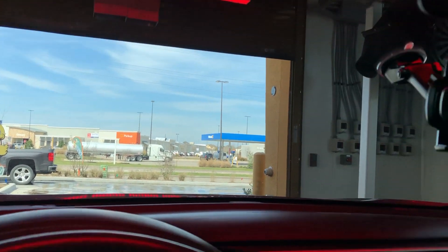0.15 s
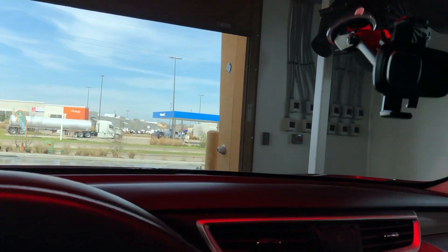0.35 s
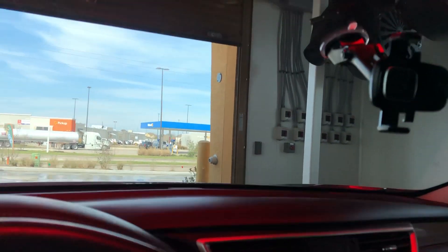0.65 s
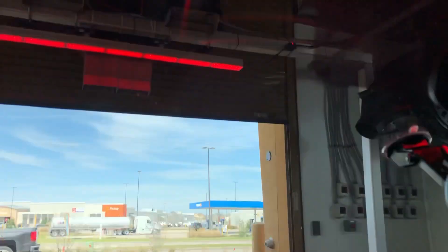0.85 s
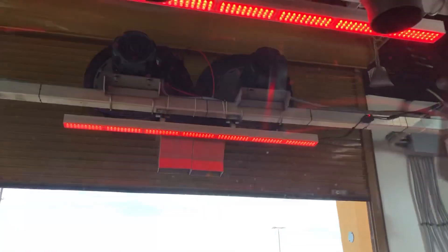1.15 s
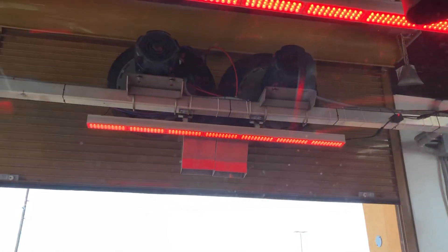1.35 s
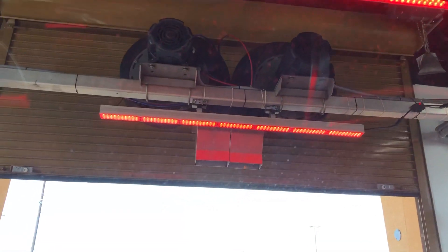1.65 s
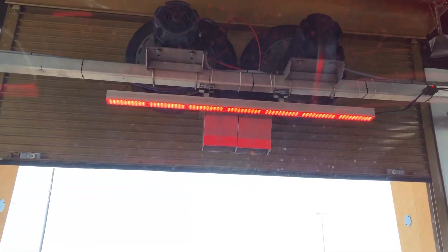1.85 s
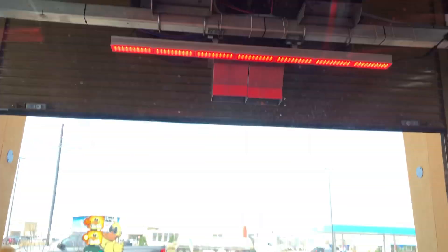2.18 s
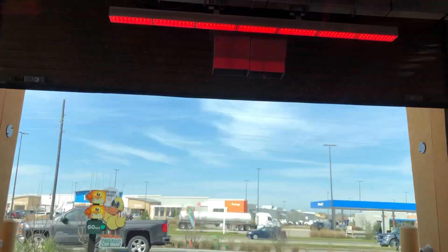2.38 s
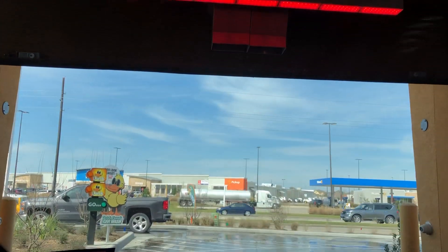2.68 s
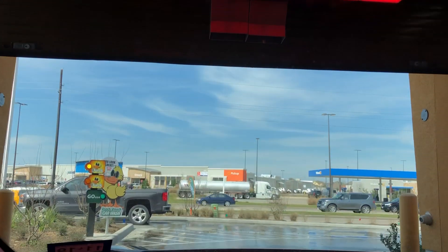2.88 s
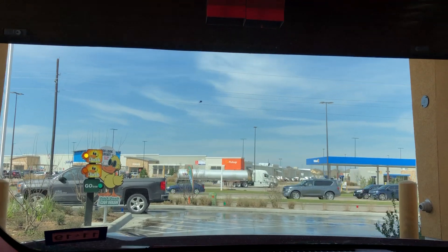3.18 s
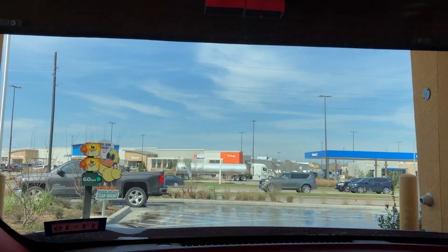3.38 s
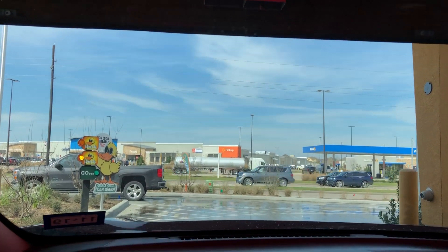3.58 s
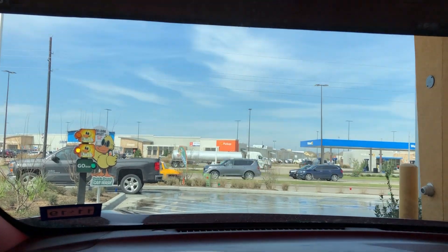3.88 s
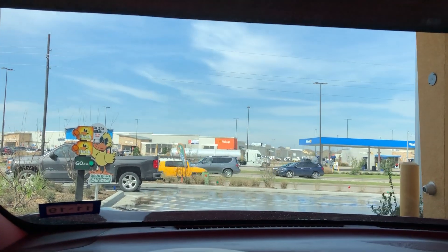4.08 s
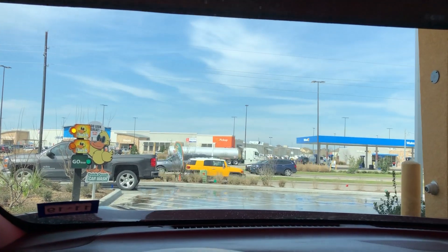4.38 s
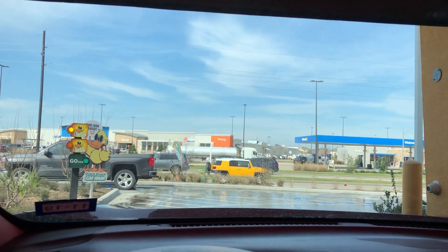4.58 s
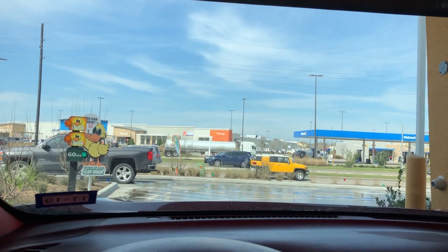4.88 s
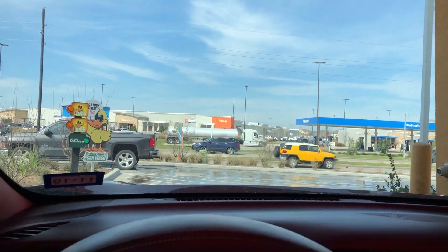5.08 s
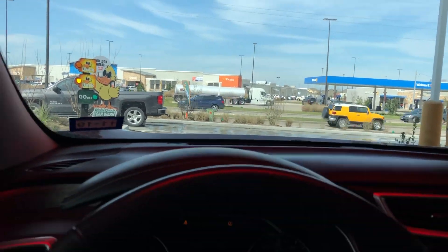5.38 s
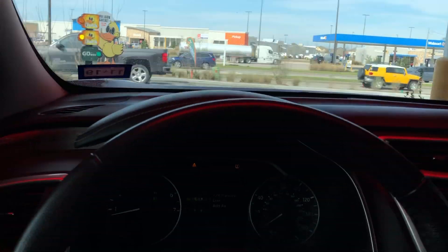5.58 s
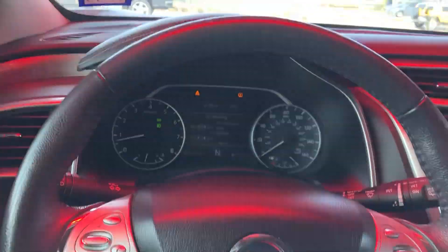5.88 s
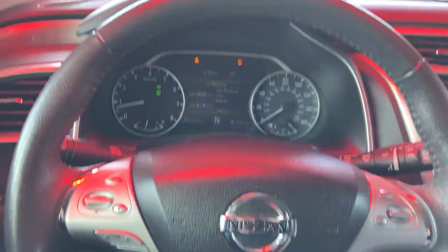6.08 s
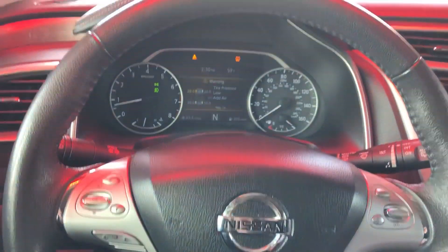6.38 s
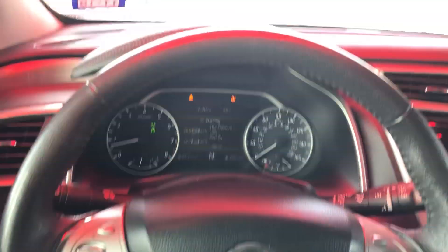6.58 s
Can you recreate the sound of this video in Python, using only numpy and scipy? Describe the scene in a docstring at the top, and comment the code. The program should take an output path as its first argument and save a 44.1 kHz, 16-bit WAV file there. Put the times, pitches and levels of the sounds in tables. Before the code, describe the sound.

Heavy low roar of car-wash air dryers heard inside a closed car, with wavering cabin boom and faint fan whine throughout.

```python
"""Car wash blowers dry a car that creeps under them, heard from the driver's seat.
Shaped noise makes the air jets on panels, glass and seals; resonances and swelling sines make the cabin boom.
The fans whine in beating sines at their blade rate. A hand rustles on the phone in puffs of bright noise;
near the end a click rings out as a snap and a faint squeak of resonant noise follows.
Gain control evens the level, a limiter ducks the peaks and a low-pass cuts the top."""
import sys
import numpy as np
from scipy import signal
from scipy.fft import rfft, irfft, next_fast_len
from scipy.io import wavfile
from scipy.ndimage import uniform_filter1d, minimum_filter1d

SR = 44100
rng = np.random.default_rng(int(sys.argv[2]) if len(sys.argv) > 2 else 0)


def generate_wav(signal):
    """Clip the signal to [-1, 1] and save it as 16-bit WAV at the path in sys.argv[1]."""
    frames = np.transpose(np.atleast_2d(signal))
    scaled = np.clip(frames, -1, 1) * 32767
    pcm = np.round(scaled).astype(np.int16)
    wavfile.write(sys.argv[1], SR, pcm)


N = 297539  # samples


def from_db(db):
    """Gain of a level in dB."""
    return 10 ** (np.asarray(db) / 20)


def rms_one(x):
    """Scaled to rms 1."""
    return x / np.sqrt(np.mean(x ** 2) + 1e-20)


def in_time(rows):
    """Each column of a curve table after the time column, drawn out to one value a sample."""
    s, *columns = np.transpose(rows)
    return [np.interp(np.arange(N) / SR, s, column) for column in columns]


def drift(rate_hz):
    """Slow chance of spread 1: noise at every 40th sample through a double one-pole low-pass."""
    r = np.exp(-2 * np.pi * rate_hz * 40 / SR)
    noise = rng.standard_normal(N // 40 + 2002)
    slow = signal.lfilter([1], [1, -2 * r, r * r], noise)[2000:]  # the filter has settled
    return np.interp(np.arange(N) / 40, np.arange(len(slow)), rms_one(slow))


def coloured(spectrum):
    """Noise of rms 1 with the given spectrum, silent outside it."""
    size = next_fast_len(N)
    hz = np.arange(1, size // 2 + 2) * SR / size
    corner_hz, corner_db = np.array(spectrum).T
    shape_db = np.interp(np.log(hz), np.log(corner_hz), corner_db, left=-200, right=-200)
    noise = irfft(rfft(rng.standard_normal(size)) * from_db(shape_db), size)
    return rms_one(noise[:N])


def turning(first, later, start_s, end_s):
    """One colour of noise gives way to another at even power."""
    turn = np.interp(np.arange(N) / SR, [start_s, end_s], [0, np.pi / 2])
    return np.cos(turn) * coloured(first) + np.sin(turn) * coloured(later)


def resonance(x, hz, width_hz):
    """Two-pole resonance, gain 1 on top."""
    r = np.exp(-np.pi * width_hz / SR)
    poles = [1, -2 * r * np.cos(2 * np.pi * hz / SR), r * r]
    return signal.lfilter([(1 - r * r) / 2, 0, (r * r - 1) / 2], poles, x)


def ring(clicks, hz, t60):
    """A unit click sets a decaying sine ringing, which falls 60 dB in t60 seconds."""
    r = from_db(-60 / (t60 * SR))
    w = 2 * np.pi * hz / SR
    return signal.lfilter([0, np.sin(w)], [1, -2 * r * np.cos(w), r * r], clicks + 1e-18)


def swell(s, db, length):
    """A smooth rise and fall centred on s."""
    place = np.clip((np.arange(N) / SR - s) / length, -.5, .5)
    return from_db(db) * np.cos(np.pi * place) ** 1.4


def air_jets():
    """Turbulent air on floor, panels, glass and seals; eddies make rush and hiss flicker together."""
    # Each row: time in seconds, strength in dB, rumble level in dB, hiss level in dB.
    air = [(0, -1, -20.5, -49.5), (0.8, -1.5, -17.5, -49.5), (1.3, 0.5, -19.5, -47), (1.75, -0.5, -15, -47),
           (2.1, 2.5, -17, -45), (2.45, 0, -16.5, -45.8), (2.9, 1.5, -18, -46.5), (3.6, 0.1, -16, -47),
           (4.25, 0.1, -20, -47.5), (4.7, 0.5, -19, -46.5), (5.4, -0.6, -18.5, -48),
           (6.05, -1.3, -17.5, -47), (6.74, -0.2, -16.5, -46.5)]
    # Spectra of the floor rumble; panels with jets ahead, then overhead; the glass with the phone held
    # up to it, then lowered to the dashboard; seals under the jets, then with the jets moving back.
    # Each row: frequency in Hz, relative density in dB per Hz.
    rumble = [(24, -34.5), (31, -26), (38, -8.5), (45, 0), (55, -0.5), (70, -1.5), (100, 4), (140, 1),
              (200, -13), (300, -30)]
    roar_ahead = [(100, -32), (170, -1), (215, -11.5), (243, -12.5), (285, -7), (311, -11.5), (344, -8),
                  (418, -12.5), (457, -12), (583, -22.5), (700, -34), (910, -55), (1540, -120)]
    roar_overhead = [(100, -22.5), (170, -0.5), (188, -8.5), (226, -7.5), (253, -10.5), (324, -5.5),
                     (356, -8.5), (413, -9.5), (454, -8), (656, -23.5), (700, -25.5), (910, -45.5),
                     (1540, -120)]
    rush_held_up = [(350, -32.5), (600, -1.5), (662, -4.5), (720, -5.5), (805, -8), (953, -9.5),
                    (1040, -13.5), (1150, -12), (1340, -15), (1370, -14), (1450, -15.5), (1490, -14.5),
                    (1850, -22), (2290, -22), (3200, -30.5), (4160, -56), (7040, -120)]
    rush_lowered = [(350, -31), (600, -0.5), (746, -8.5), (864, -2.5), (1060, -12.5), (1120, -11),
                    (1370, -13), (1950, -21), (2420, -21.5), (2590, -24.5), (3200, -35), (4160, -50),
                    (7040, -120)]
    hiss_under = [(1650, -25), (2800, -3.5), (3660, -2.5), (4080, -5.5), (5540, -7.5), (7940, -17.5),
                  (11300, -30.5), (16500, -35), (17500, -41)]
    hiss_back = [(1650, -32), (2800, -2), (5410, -7.5), (8980, -20), (11600, -31.5), (16500, -32),
                 (17500, -39.5)]

    air_db, rumble_db, hiss_db = in_time(air)
    eddies = drift(36)
    # roar and rush take a share of the swing in strength
    roar_db = -16 + 0.79 * air_db + 0.65 * drift(10)
    rush_db = -31 + 0.87 * air_db + 0.8 * eddies + 0.18 * drift(24)
    hiss_db = hiss_db + 0.56 * eddies + 0.3 * drift(25)
    return (from_db(rumble_db) * coloured(rumble)
            + from_db(roar_db) * turning(roar_ahead, roar_overhead, 1.69, 3.1)
            + from_db(rush_db) * turning(rush_held_up, rush_lowered, 4.9, 5.76)
            + from_db(hiss_db) * turning(hiss_under, hiss_back, 3.5, 4.4))


def cabin_boom():
    """Pressure noise rings each low mode of the cabin; big swings are damped more, which evens the level."""
    # Each row: time in seconds, levels of the first, second and third mode in dB.
    boom = [(0, -23.5, -14, -22), (0.5, -11, -20, -33), (1.0, -12, -20, -30.5), (1.6, -14, -14.5, -29.5),
            (2.4, -15.5, -17, -26.5), (3.1, -19, -22, -23), (3.6, -17, -21.5, -23), (4.1, -16, -22, -24.5),
            (4.7, -25, -19, -22), (5.3, -17, -19.5, -25.5), (6.0, -20.5, -18.5, -27),
            (6.74, -17, -15.5, -37)]
    # Cabin modes. Each row: frequency in Hz, width of the first of two resonances in Hz.
    modes = [(127, 27.7), (158, 24.8), (333, 25.8)]
    out = 0
    for (hz, width_hz), level_db in zip(modes, in_time(boom)):
        push = rng.standard_normal(N + SR)
        once = resonance(push, hz, width_hz)
        twice = resonance(once, hz, 0.97 * width_hz)
        mode = rms_one(twice[SR:])  # already ringing at the start
        swing = np.sqrt(uniform_filter1d(mode ** 2, size=1300) + 0.034)
        out = out + from_db(level_db) * rms_one(mode / swing ** .6)
    return out


def drone():
    """Swells near the cabin modes: each is a near sine that rises a little; pitch and level tremble."""
    # Each row: centre in seconds, frequency there in Hz, level in dB, length in seconds.
    swells = [(0.15, 162.5, -10.5, 0.18), (0.58, 119.3, -6, 0.22), (0.77, 163, -7.5, 0.17),
              (0.94, 130, -8.5, 0.32), (1.25, 129, -15, 0.17), (1.52, 124.2, -9, .25),
              (1.92, 160.4, -12.5, 0.27), (2.12, 136, -7.5, 0.31), (2.34, 115, -14, 0.21),
              (2.66, 160.6, -9.5, .2), (2.89, 133, -14, 0.094), (3.104, 330.5, -15, 0.23),
              (3.3, 159.3, -11.5, 0.27), (3.5, 128.4, -16, 0.27), (3.75, 160, -12, .3),
              (4.1, 134.3, -16.5, 0.41), (4.42, 120, -6.5, 0.29), (4.5, 328.4, -16, 0.19),
              (4.68, 157, -6, 0.33), (4.847, 330.6, -20.5, .3), (4.88, 130.5, -7.5, .2),
              (5.04, 157.6, -6.5, 0.18), (5.16, 140, -9, 0.085), (5.4, 147.3, -19, .3),
              (5.88, 142.5, -14.5, 0.32), (6.13, 160, -12.5, 0.089), (6.32, 128, -8.5, .12),
              (6.56, 134.3, -12.5, 0.29), (6.72, 151, -8.5, 0.25)]
    rise_hz_per_s = 38
    t = np.arange(N) / SR
    tremble = 2 * np.pi * np.cumsum(2.74 * drift(15.5)) / SR
    out = 0
    for s, hz, db, length in swells:
        mean_hz = hz + rise_hz_per_s * (t - s) / 2  # averaged from the centre to now
        out = out + swell(s, db, length) * np.sin(2 * np.pi * mean_hz * (t - s) + tremble)
    return from_db(0.92 * drift(19)) * out


def blade_whine():
    """Blade-passing tones of several fans and multiples; the path through moving air blurs pitch and level."""
    # Fans at slightly unlike speeds, so their tones beat. Each row: detune in Hz,
    # starting level at the blade rate in dB, starting level at its second multiple in dB.
    fans = [(0.85, -39, -49.5), (-0.48, -41.5, -48), (-2, -44.5, -51.5), (2, -44.5, -51.5)]
    # Steady higher tones. Each row: multiple of the blade rate, level in dB.
    upper_whine = [(3, -62), (4, -66)]
    # Surges. Each row: centre in seconds, multiple of the blade rate, level in dB, length in seconds.
    surges = [(0.84, 1, -33.5, 0.25), (0.98, 2, -37, 0.24), (1.255, 2, -40, 0.29), (1.326, 1, -29.5, .16),
              (1.41, 2, -33.5, 0.062), (1.618, 2, -41, 0.061), (1.812, 2, -33.5, 0.28),
              (2.1, 1, -33.5, 0.88), (2.327, 2, -34.5, 0.16), (2.6, 1, -35, .15), (2.742, 2, -37, .12),
              (3.38, 2, -40, .25), (3.42, 1, -31.5, 0.35), (4.196, 2, -39, .35), (4.217, 1, -37, 0.15),
              (4.58, 1, -37, .2), (4.858, 1, -34, 0.28), (5.614, 2, -35, .1), (6.59, 1, -30, .08)]
    blade_hz, fade_db_per_s = 707.3, 0.9

    t = np.arange(N) / SR
    phase = 2 * np.pi * np.cumsum(blade_hz + 0.8 * drift(2.45)) / SR
    out = sum(from_db(db) * np.sin(multiple * phase) for multiple, db in upper_whine)
    for detune_hz, first_db, second_db in fans:
        own = phase + 2 * np.pi * (detune_hz * t + rng.random())
        change_db = 1.1 * drift(8.6) - fade_db_per_s * t
        out = out + from_db(first_db + change_db) * np.sin(own)
        out = out + from_db(second_db + change_db) * np.sin(2 * own + 0.5 * drift(7.4))
    blurred = phase + 0.3 * drift(14)
    flutter = from_db(1.6 * drift(18))
    for s, multiple, db, length in surges:
        out = out + flutter * swell(s, db, length) * np.sin(round(multiple) * blurred)
    return out


def snap():
    """One sharp click into the short modes of hard plastic."""
    # Each row: frequency in Hz, level relative to the click in dB, 60 dB decay time in seconds.
    modes = [(4380, -4, 0.011), (5060, -6, .008), (6100, -6, .007), (7440, -3, .005), (9500, -1.5, 0.0054),
             (10800, -10, .004), (11800, -9, .004), (13100, -7, .003), (14400, -7, .003), (15500, 2, .003),
             (16600, 3.5, .003)]
    click = np.zeros(N)
    click[round(5.8613 * SR)] = from_db(-24.5)
    out = 0
    for k, (hz, db, t60) in enumerate(modes):
        out = out + (-1) ** k * from_db(db) * ring(click, hz, t60)  # neighbours in opposite polarity
    return out


def squeak():
    """Friction noise in a few narrow resonances, fluttering fast; it swells, then fades."""
    # Low and high voice. Each row: frequency in Hz, width in Hz, relative level in dB.
    low = [(4102, 30, -1), (4224, 90, 0)]
    high = [(5765, 60, -11), (6266, 60, -2), (6336, 50, 0), (6573, 40, -4)]
    start_s, peak_s = 5.88, 6.06
    rise_db_per_s, fade_db_per_s = 38, 22
    t = np.arange(N) / SR
    shape_db = np.minimum(rise_db_per_s * (t - peak_s), fade_db_per_s * (peak_s - t))
    out = 0
    for tones, peak_db in ((low, -54), (high, -51.5)):
        flutter_db = 2 * drift(60) + 1.5 * drift(25)
        rub = rng.standard_normal(N) * from_db(flutter_db)
        voice = sum(from_db(db) * rms_one(resonance(rub, hz, width_hz)) for hz, width_hz, db in tones)
        out = out + from_db(peak_db + shape_db) * (t > start_s) * rms_one(voice)
    return out


def rustles():
    """The hand on the phone: short puffs of bright noise."""
    # Each row: start in seconds, level in dB, length in seconds.
    puff_rows = [(.389, -54, .007), (.402, -56, .008), (.598, -63, .012), (.612, -65, .006),
                 (.623, -60, .008), (4.62, -64, .035), (4.79, -64, .03), (4.870, -64, .008),
                 (6.533, -65, .008), (6.668, -62, .004)]
    t = np.arange(N) / SR
    puffs = 0
    for s, db, length in puff_rows:
        puffs = puffs + from_db(db) * np.sin(np.pi * np.clip((t - s) / length, 0, 1))
    band = signal.butter(2, [4500, 16500], "band", fs=SR, output="sos")
    return puffs * rms_one(signal.sosfilt(band, rng.standard_normal(N)))


def scene():
    """Everything as it reaches one microphone in the cabin."""
    return (air_jets() + cabin_boom() + drone() + blade_whine() + snap() + squeak() + rustles())[None]


def record(dry):
    """Gain control evens the loudness, a look-ahead limiter ducks the peaks; then the top is cut."""
    loud_db = 10 * np.log10(uniform_filter1d(dry[0] ** 2, size=3500) + 1e-9)
    x = dry[0] * from_db(-0.25 * (loud_db + 11.5))  # a quarter of the way towards -11.5 dB
    over_db = np.maximum(20 * np.log10(np.abs(x) + 1e-9) + 0.01, 0)
    fall_db = 60 * np.arange(N) / SR  # the limiter recovers at 60 dB per second
    held_db = np.maximum.accumulate(over_db + fall_db) - fall_db
    # centred windows start the ducking ahead of the peak
    gain_db = uniform_filter1d(minimum_filter1d(-held_db, size=133), size=67)
    low_pass = signal.ellip(9, 0.1, 60, 17200, fs=SR, output="sos")
    return signal.sosfilt(low_pass, x * from_db(gain_db))[None]


dry = scene()
out = record(dry)
generate_wav(out)
```